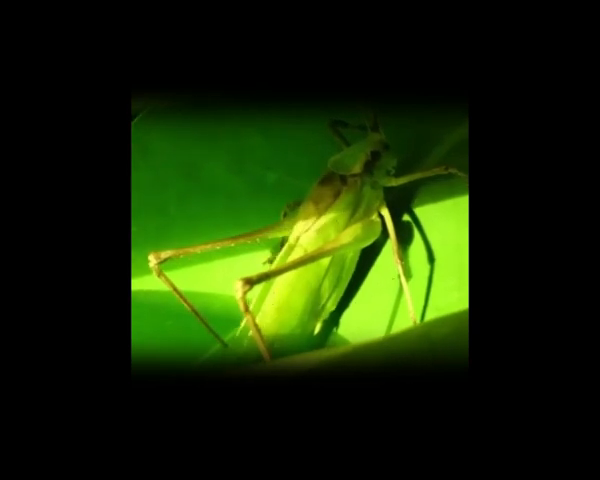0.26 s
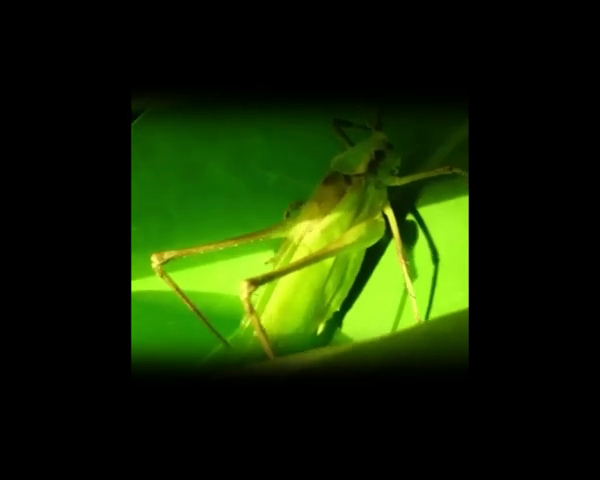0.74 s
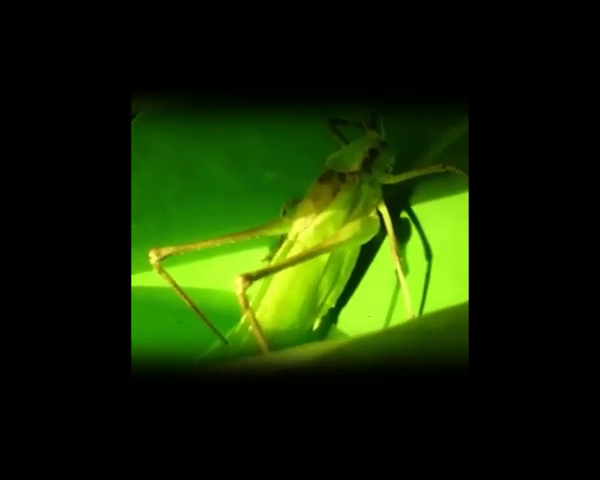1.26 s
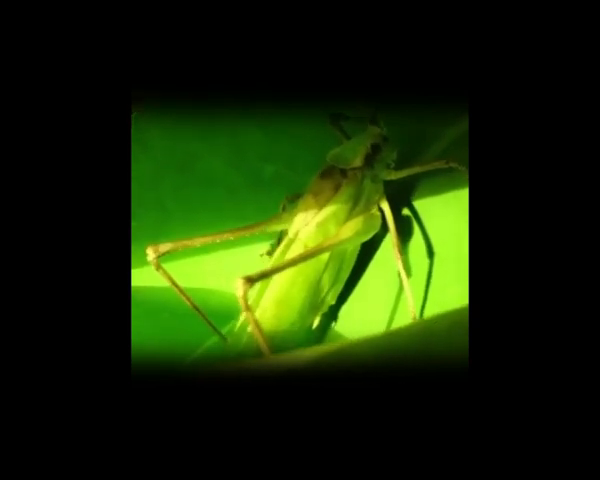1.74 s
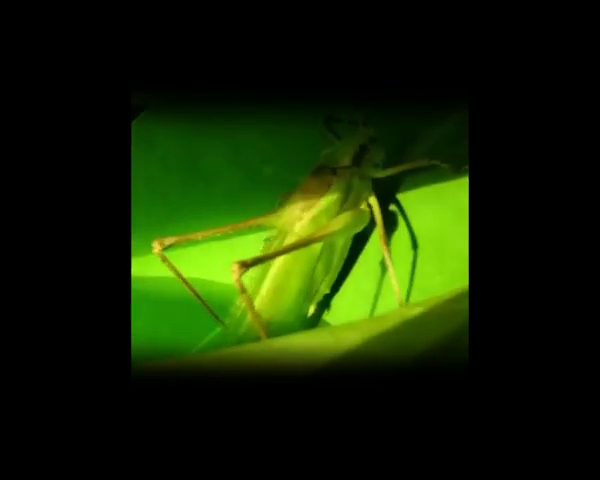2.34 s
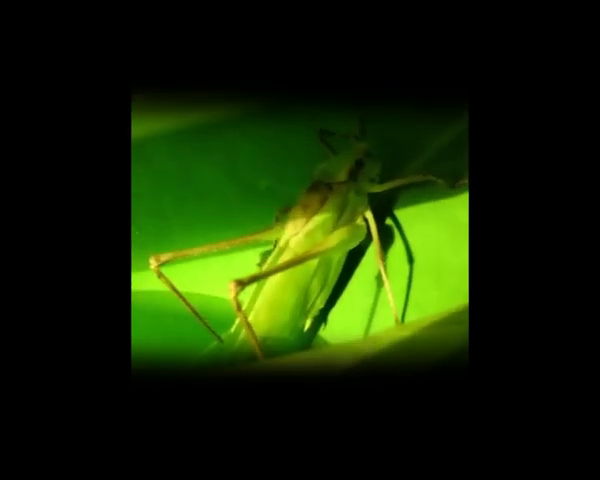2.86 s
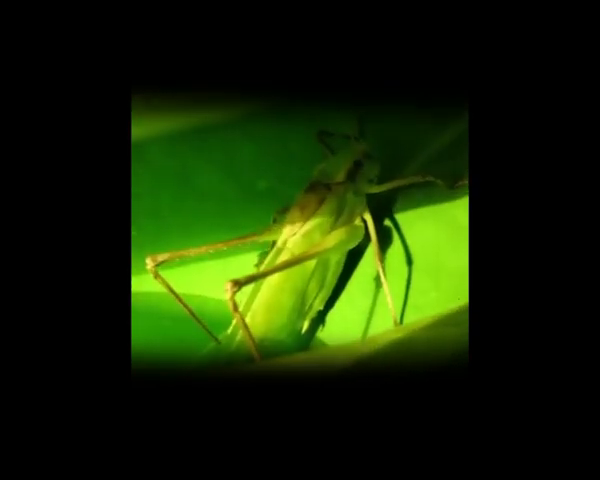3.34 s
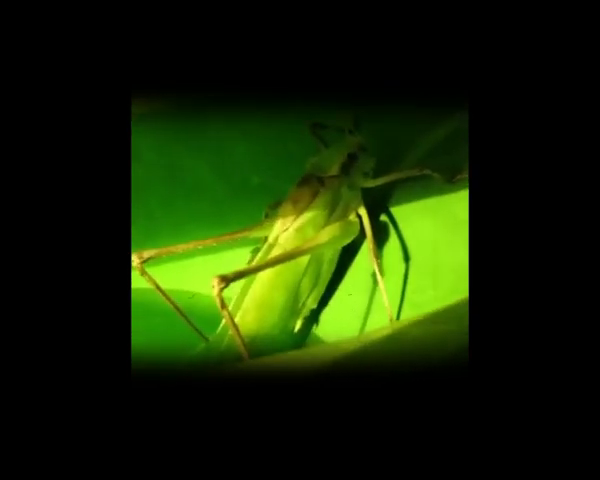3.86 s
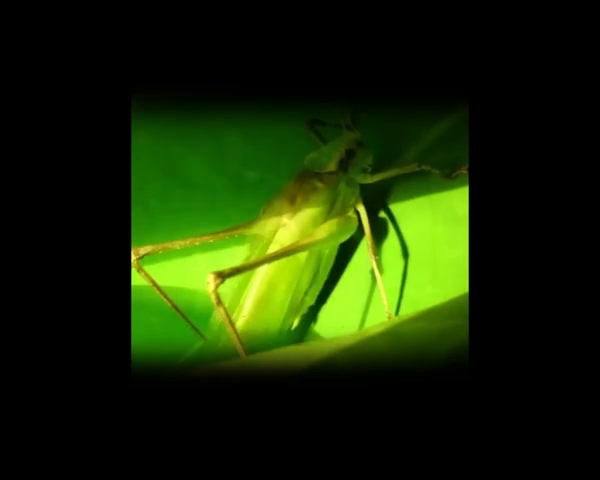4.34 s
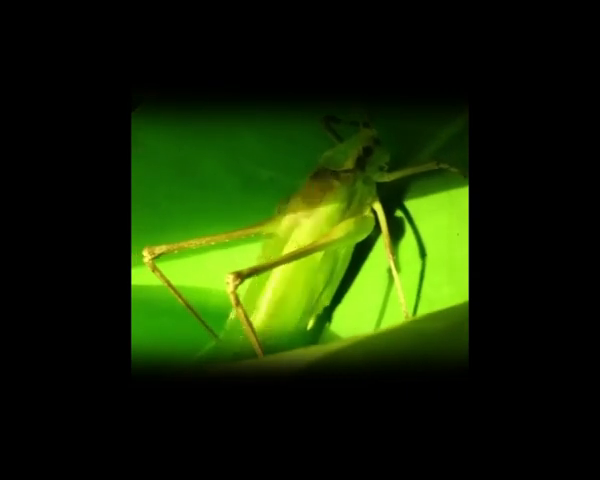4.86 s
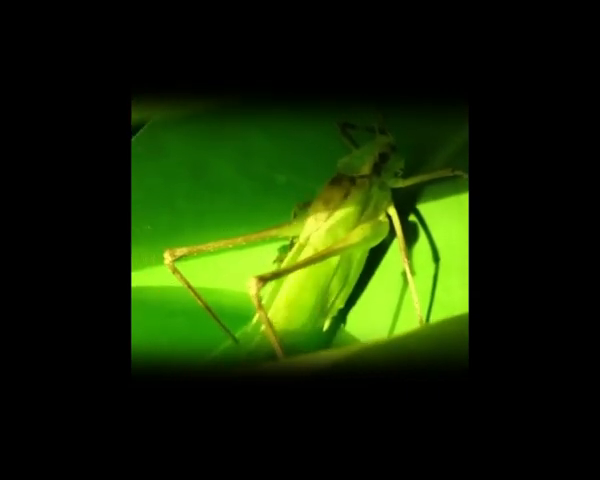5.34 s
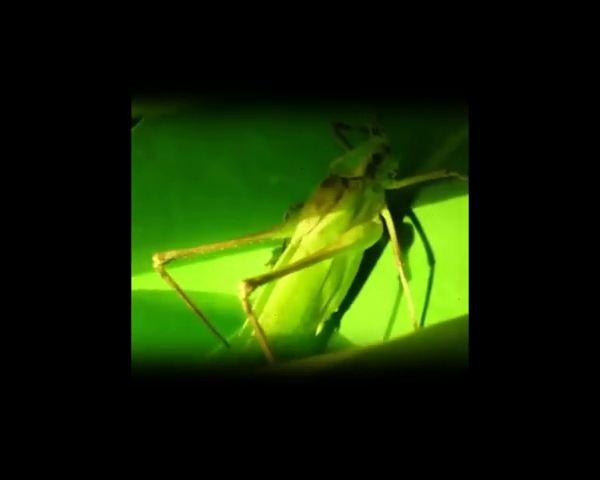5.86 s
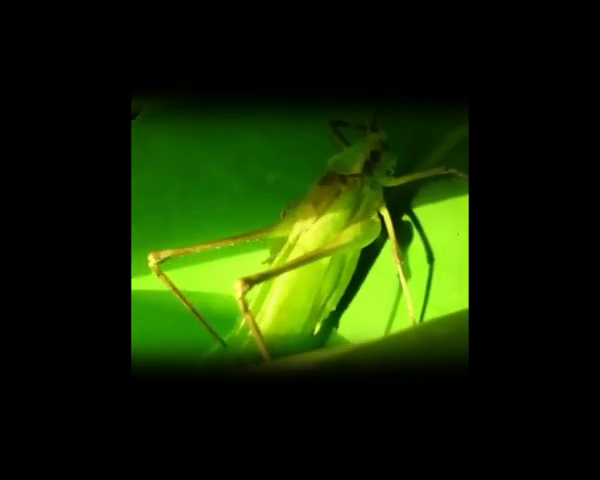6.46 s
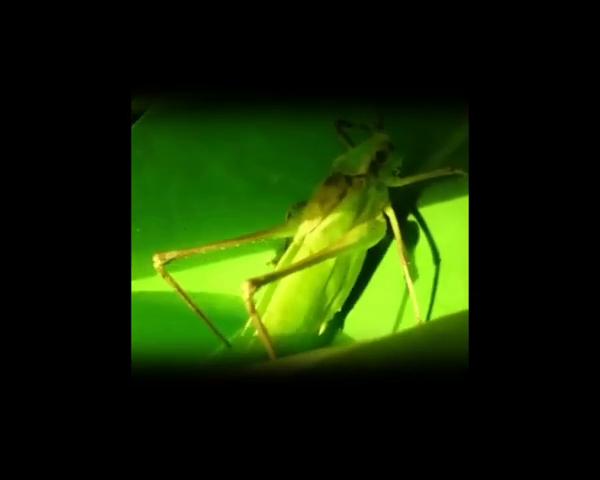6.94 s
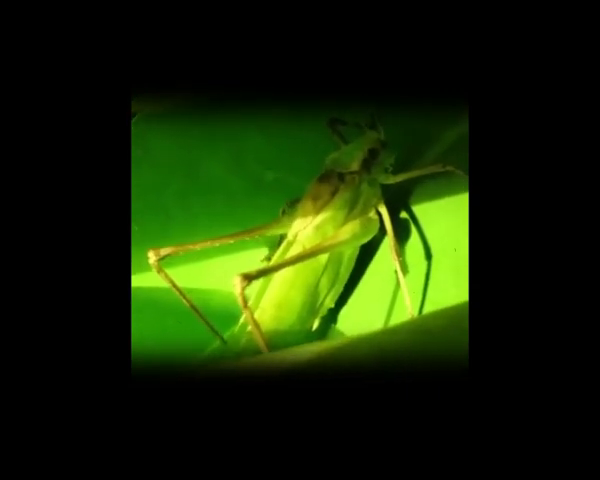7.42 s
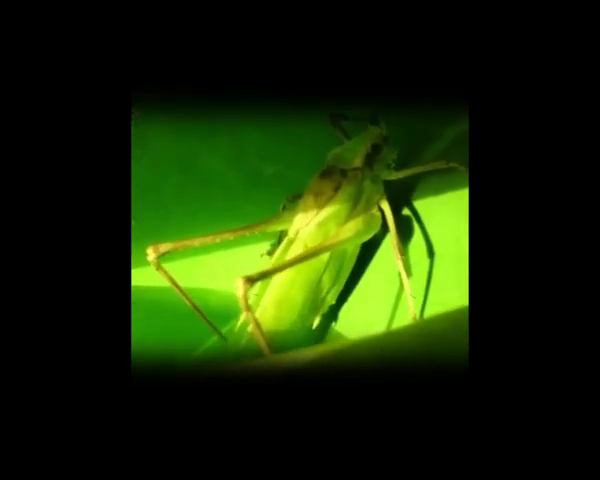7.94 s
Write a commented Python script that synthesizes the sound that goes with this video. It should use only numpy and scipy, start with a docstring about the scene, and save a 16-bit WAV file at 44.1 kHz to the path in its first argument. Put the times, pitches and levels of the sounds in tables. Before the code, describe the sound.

A katydid sings close to the microphone in a small room, repeating short, shrill, slightly raspy chirps about nine times a second. Far behind it lie a faint low hum, soft hiss and traffic rumble, with one engine passing and two barely audible toots. The chirping keeps its pace throughout, and the sound cuts out for an instant near the end.

```python
"""Katydid in a small room

A katydid sings close by, about nine chirps a second, over faint distant traffic and a low hum. Each
chirp is one wing cycle: a soft opening stroke, a loud closing stroke that glides up as the scraper speeds
along the file, and a short scrape as the wings come to rest. Near the end the sound cuts out briefly."""
import sys
import numpy as np
from scipy import signal
from scipy.fft import rfft, irfft, next_fast_len
from scipy.io import wavfile
from scipy.ndimage import map_coordinates

SR = 44100
rng = np.random.default_rng(int(sys.argv[2]) if len(sys.argv) > 2 else 0)


def unload_wav(signal):
    """Save mono or channel-first audio to the path in sys.argv[1] as 16-bit WAV at rate SR, clipped to [-1, 1]."""
    wavfile.write(
        sys.argv[1],
        SR,
        np.round(np.clip(np.atleast_2d(signal).T, -1, 1) * 32767).astype(np.int16),
    )


N = 361179


def amp(db):
    """Gain of a level in dB."""
    return 10 ** (np.asarray(db) / 20)


def unit(x):
    """x at rms 1."""
    return x / np.sqrt(np.mean(x ** 2) + 1e-20)


def along(points, hz):
    """Read a curve of (freq_hz, value) points on a log frequency axis."""
    freqs, values = np.transpose(points)
    return np.interp(np.log(hz + 1), np.log(freqs + 1), values)


def filtered(x, response):
    """x through an EQ given as gain against frequency."""
    size = next_fast_len(N + SR // 2)
    return irfft(rfft(x, size) * response(np.fft.rfftfreq(size, 1 / SR)), size)[:N]


def noise(colour):
    """Noise of rms 1, coloured by (freq_hz, gain_db) points."""
    return unit(filtered(rng.standard_normal(N), lambda hz: amp(along(colour, hz))))


def wobble(rate):
    """A smooth random curve, rate knots a second."""
    return map_coordinates(rng.standard_normal(int(N * rate / SR) + 4), [np.arange(N) * rate / SR])


def sine(hz):
    """A sine that follows a pitch curve."""
    return np.sin(2 * np.pi * np.cumsum(hz) / SR)


def bell(t, centre, attack, release, flatness=2):
    """A smooth rise to 1 at centre and a smooth fall; flatness above 2 broadens the top."""
    return np.exp(-.5 * abs((t - centre) / np.where(t < centre, attack, release)) ** flatness)


def background(rumble_db=-55.3, ebb_db_per_s=-.6, hum_hz=49, hum_db=-60, hiss_db=-60):
    """The bed: an ebbing rumble that lifts as an engine passes, dull swells, wavering hum, faint hiss."""
    t = np.arange(N) / SR
    # colours of the three noises: freq_hz, gain_db
    rumble_colour = [(30, -38), (60, -7), (90, -3), (115, 1), (160, -3), (210, -9.5), (500, -10.5),
                     (750, -16), (1000, -23.5), (3000, -40)]
    swell_colour = [(50, -20), (95, 0), (165, -4), (260, -25), (600, -60)]
    hiss_colour = [(20, 1), (60, 13.5), (200, -10), (700, 4), (1500, 2), (5000, 2.5), (12000, -68),
                   (16000, -46)]
    # low swells in the distance: peak_s, width_s, level_db
    far_swells = [(.96, .07, -54), (1.78, .1, -56), (2.07, .07, -51), (3.35, .15, -58), (4.2, .07, -56)]
    engine_lift_db = 3.3 * bell(t, centre=2.2, attack=.4, release=.4)
    lumpy_noise = unit(amp(1.5 * wobble(9)) * noise(rumble_colour))
    rumble = amp(rumble_db + ebb_db_per_s * t + engine_lift_db) * lumpy_noise
    swells = sum(amp(db) * bell(t, at, width, width) for at, width, db in far_swells) * noise(swell_colour)
    hum = amp(hum_db - .25 * t + 4 * wobble(12)) * sine(hum_hz + 3.2 * wobble(9))
    return rumble + swells + hum + amp(hiss_db) * noise(hiss_colour)


def traffic(pass_s=2.7, width_s=.59, drone_hz=225, fall_hz=65, drone_db=-60.5, toot_width_s=.034):
    """A distant engine passes with a falling drone; two short toots arrive blurred."""
    t = np.arange(N) / SR
    # far-off toots: peak_s, pitch_hz, level_db
    toot_cues = [(2.31, 910, -54), (5.84, 902, -54.5)]
    pitch = drone_hz - fall_hz * np.tanh(t - pass_s) + 18 * wobble(60)
    drone = amp(drone_db + 4 * wobble(20)) * bell(t, pass_s, width_s, width_s) * sine(pitch)
    toots = sum(amp(db) * bell(t, at, toot_width_s, toot_width_s) * sine(hz + 55 * wobble(200))
                for at, hz, db in toot_cues)
    return drone + toots


def room(x, predelay_s=.0095):
    """The walls answer after a short gap; each frequency dies at its own speed."""
    # reverb EQ: freq_hz, gain_db
    wall_colour = [(1000, -16), (2100, -3.5), (2650, -4), (2950, -7.8), (3300, -4.5), (3700, -6.5),
                   (5200, -8.5), (6200, -7.5), (7800, -7), (8250, -12), (8700, -11), (9200, -9.5),
                   (10200, -5.7), (11200, -8.5), (13000, -7), (15000, -6)]
    # reverb decay: freq_hz, t60_s
    decay_times = [(1000, 0.41), (3000, .22), (5000, 0.28), (9000, 0.36), (15000, 0.24)]
    freqs, t, bands = signal.stft(rng.standard_normal(SR // 2), SR, nperseg=256)
    decay = amp(-60 * t / along(decay_times, freqs)[:, None])
    tail = signal.istft(bands * decay, SR, nperseg=256)[1]
    tail = np.pad(tail / np.linalg.norm(tail), (int(predelay_s * SR), 0))
    return filtered(signal.fftconvolve(x, tail)[:N], lambda hz: amp(along(wall_colour, hz)))


def near_echo(x, delay_s=.00536):
    """A nearby surface sends back a quick, dull echo."""
    # echo EQ: freq_hz, gain_db
    echo_colour = [(1500, -22), (2550, -8), (3300, -8), (3700, -20), (6000, -17), (9000, -24)]
    return filtered(x, lambda hz: amp(along(echo_colour, hz)) * np.exp(-2j * np.pi * hz * delay_s))


def chirp_times():
    """The insect sings in runs of evenly spaced chirps, each run lasting until the next."""
    # runs of chirps: start_s, period_s
    runs = [(.0152, .1132), (.5878, .1135), (1.1596, .1102), (1.8223, .1139), (2.3968, .1137),
            (2.7331, .1106), (3.0762, .1137), (4.1035, .1119), (4.8954, .1133), (6.1355, .1136),
            (7.6211, .1115), (7.9625, .1265), (8.089, .11)]
    ends = [start for start, _ in runs[1:]] + [N / SR + runs[-1][1]]
    return np.concatenate([np.arange(start, end - period / 2, period)
                           for (start, period), end in zip(runs, ends)])


def nearest_chirp():
    """Per sample: seconds from the nearest chirp, then its layer levels; a skid trades tone for rasp."""
    # chirps where the scraper skids on the file: time_s, harshness (0-1)
    skids = [(.47, .6), (.59, .6), (1.04, .5), (2.73, 1), (3.19, .8), (3.42, 1), (4.1, .4), (4.22, .4),
             (4.44, .9), (5.12, 1), (5.57, .8), (6.25, .7), (6.48, .5)]
    # layers of a chirp: level_db, full_skid_change_db, drift_db_per_s, scatter_db
    tone_mix = (-17.8, -.7, -.26, .25)
    shrill_mix = (-15.7, -1.7, .02, .3)
    rasp_mix = (-32.3, 4.2, -.31, .8)
    scrape_mix = (-27.4, 2.8, -.5, 1.7)
    t, chirps = np.arange(N) / SR, chirp_times()
    skidding = [np.argmin(abs(chirps - at)) for at, _ in skids]
    harshness = np.bincount(skidding, [amount for _, amount in skids], len(chirps))
    base, skid, drift, scatter = np.transpose([tone_mix, shrill_mix, rasp_mix, scrape_mix])
    levels = base + skid * harshness[:, None] + drift * chirps[:, None]
    levels += scatter * rng.standard_normal(levels.shape)
    nearest = np.searchsorted((chirps[1:] + chirps[:-1]) / 2, t)
    return t - chirps[nearest], *levels[nearest].T


def strokes_db(since, *strokes):
    """Envelope of one wing cycle: each stroke swells and dies away."""
    gains = [amp(db) * bell(since, at, attack, release, flatness=2.5) for at, attack, release, db in strokes]
    return 20 * np.log10(np.max(gains, axis=0) + 1e-9)


def wing_envelopes(since):
    """Tone, shrill and rasp envelopes in dB: a soft opening stroke, then a loud closing one."""
    # strokes: peak_s (from mid closing stroke), attack_s, release_s, peak_db
    opening_tone = (-.0145, .0034, .0022, -11.6)
    closing_tone = (-.0001, .0048, .0042, .4)
    opening_shrill = (-.0138, .0017, .0015, -15.5)
    closing_shrill = (.0005, .0035, .0032, 1.6)
    opening_rasp = (-.0148, .0034, .007, -1.8)
    closing_rasp = (-.0025, .0052, .0095, 4.1)
    return (strokes_db(since, opening_tone, closing_tone),
            strokes_db(since, opening_shrill, closing_shrill),
            strokes_db(since, opening_rasp, closing_rasp))


def tooth_rate(since, opening_hz=2810, slow_hz=2720, fast_hz=3080,
               turn_s=-.0095, glide_at_s=-.0023, glide_s=.0035):
    """The scraper strikes the teeth steadily on opening and speeds up as the wings close."""
    glide = (1 + np.tanh((since - glide_at_s) / glide_s)) / 2
    return np.where(since < turn_s, opening_hz, slow_hz + (fast_hz - slow_hz) * glide)


def wing_partial(hz):
    """A gliding partial swells or dips as it crosses the wing's resonances."""
    # wing resonances: centre_hz, width_hz, gain_db
    resonances = [(5600, 190, -0.5), (8317, 202, -28.5), (11280, 190, 13), (12870, 200, 5.5)]
    gain_db = sum(db * np.exp(-((hz - centre) / width) ** 2) for centre, width, db in resonances)
    return amp(gain_db) * sine(hz)


def opening_squeak(since, at_s=-.016, width_s=.002, pitch_hz=5620, fall_hz_per_s=40000, level_db=-41):
    """The scraper drags back with a small falling squeak as the wings part."""
    pitch = pitch_hz - fall_hz_per_s * (since - at_s) + 90 * wobble(900)
    return amp(level_db + 3.5 * wobble(9)) * bell(since, at_s, width_s, width_s) * sine(pitch)


def end_scrape(since, at_s=.0098, width_s=.0024):
    """A short, bright scrape as the wings come to rest."""
    # scrape colour: freq_hz, gain_db
    scrape_colour = [(1500, -28), (3000, -16), (5600, -20), (6250, 4), (7000, -20), (7900, -8), (8250, -20),
                     (9100, 6), (9900, 1), (10900, 4), (12200, -12), (14800, -15), (16500, -30)]
    return bell(since, at_s, width_s, width_s) * noise(scrape_colour)


def katydid(jitter=.00356, drift=.004, pace_spread=.035, flutter_db=.6, shimmer_db=2.2,
            brightening=.5, under_db=-27.5, under_shift_hz=4810):
    """File teeth drive the wing at their strike rate; uneven strikes add a rasp."""
    # weaker wing partials: tooth_rate_ratio, level_db (against the wing tone)
    partials = [(1.38, -25), (1.7, -13.6), (2, -11), (2.66, -26), (3.96, -18.5), (4.3, -18.2), (5.05, -33)]
    # colour of the teeth's rasp: freq_hz, gain_db
    rasp_colour = [(500, -17), (1600, -19), (2080, -8.5), (2380, -10), (2620, 13), (2950, 7.5), (3270, 5),
                   (3500, -.5), (4200, .5), (4800, .5), (6800, -2), (7900, 0), (8250, -12), (8700, 11),
                   (9800, -.5), (11200, .5), (12900, -8), (13600, -22), (15200, -14), (16500, -22)]
    since, tone_db, shrill_db, rasp_db, scrape_db = nearest_chirp()
    since = since * (1 + pace_spread * wobble(9))  # no two strokes take quite the same time
    force_db, shrill_env_db, rasp_env_db = wing_envelopes(since)
    slip = amp(np.minimum(rasp_db - tone_db + 13, 8))  # raspy strokes catch the teeth less evenly
    tooth_hz = tooth_rate(since) * (1 + jitter * slip * wobble(900) + drift * wobble(9))
    force_db = force_db + flutter_db * wobble(500)
    overtones = sum(amp(db + shimmer_db * wobble(150)) * wing_partial(ratio * tooth_hz)
                    for ratio, db in partials)
    tone = amp(tone_db + force_db) * (sine(tooth_hz) + amp(brightening * force_db) * overtones)
    # the shrill third harmonic sounds only at the height of each stroke
    shrill = amp(shrill_db + shrill_env_db) * wing_partial(3 * tooth_hz)
    # a faint low partial sweeps up twice as fast as the tooth rate
    under_gain = amp(tone_db + (1 + brightening) * force_db + under_db)
    undertone = under_gain * sine(2 * tooth_hz - under_shift_hz)
    rasp = amp(rasp_db + rasp_env_db + 1.42 * wobble(700)) * noise(rasp_colour)
    scrape = amp(scrape_db) * end_scrape(since)
    return tone + shrill + undertone + rasp + scrape + opening_squeak(since)


def scene():
    """The katydid with its echo and reverb, over the bed and the traffic, in mono."""
    song = katydid()
    return (song + near_echo(song) + room(song) + background() + traffic())[None]


def record(dry, top_hz=16600):
    """The sound cuts out for a moment, and the highest treble is removed."""
    # dropout: start_s, end_s
    dropout = (8.034, 8.097)
    t = np.arange(N) / SR
    live = (t < dropout[0]) | (t > dropout[1])
    return filtered(dry[0] * live, lambda hz: hz < top_hz)[None]


dry = scene()
out = record(dry)
unload_wav(out)
```